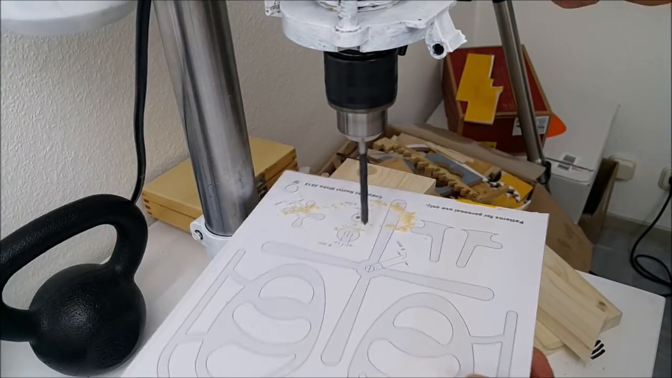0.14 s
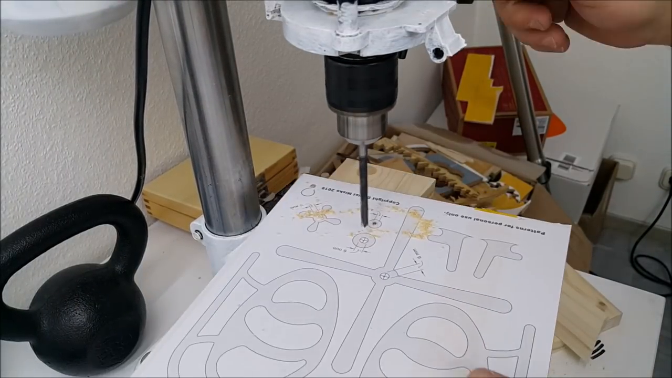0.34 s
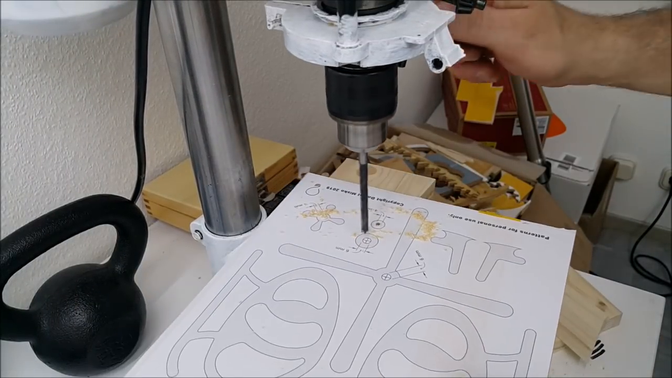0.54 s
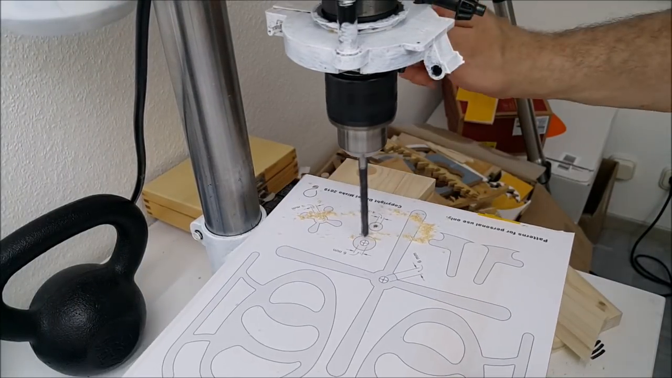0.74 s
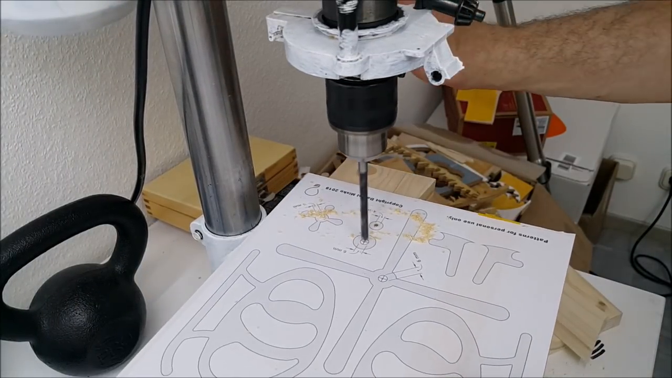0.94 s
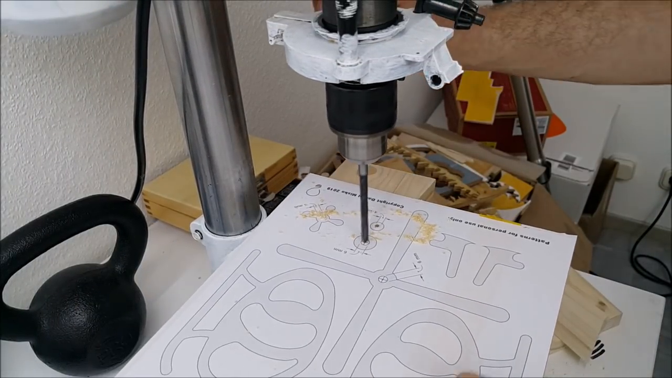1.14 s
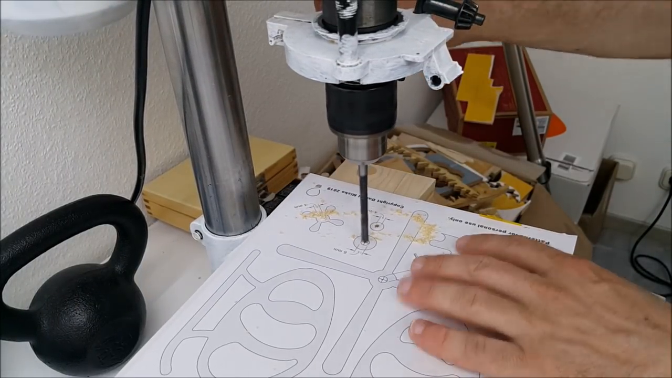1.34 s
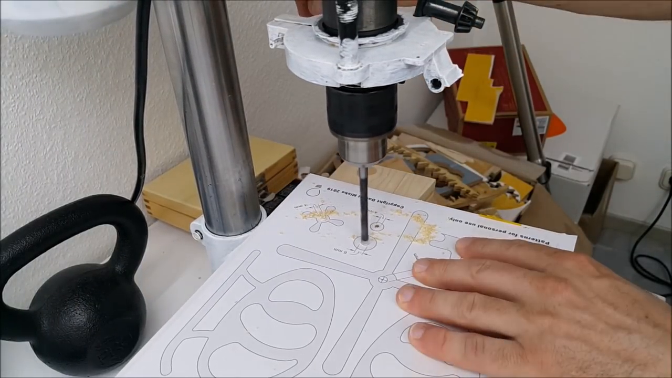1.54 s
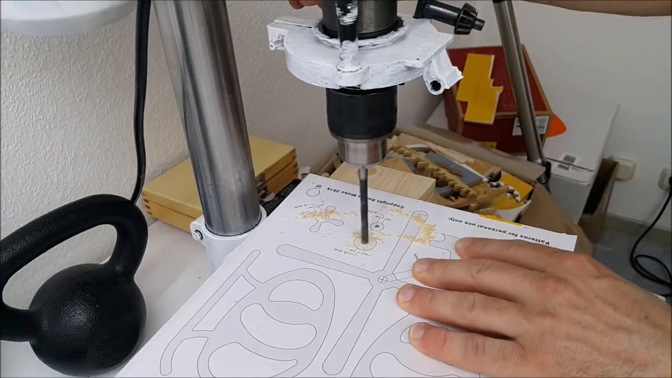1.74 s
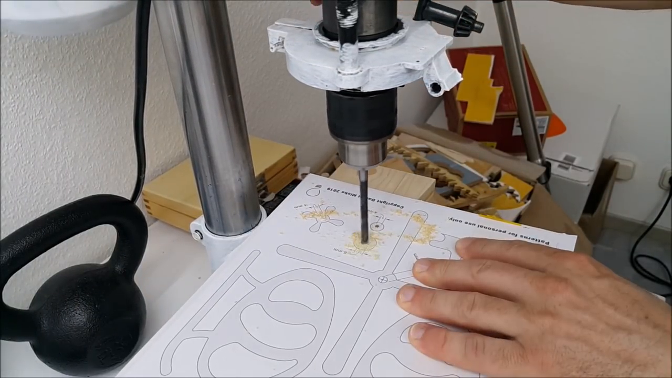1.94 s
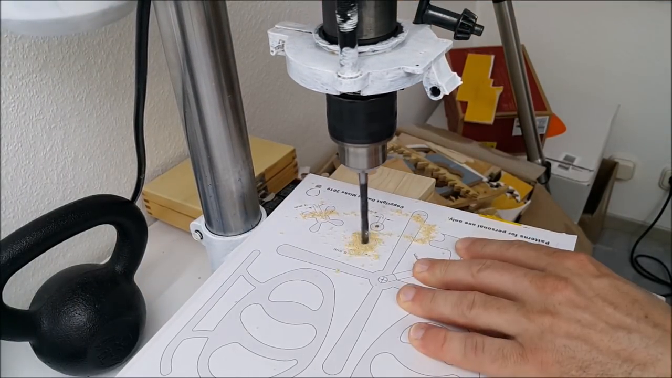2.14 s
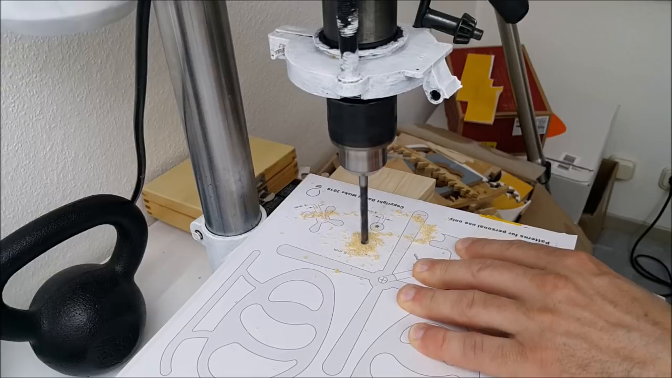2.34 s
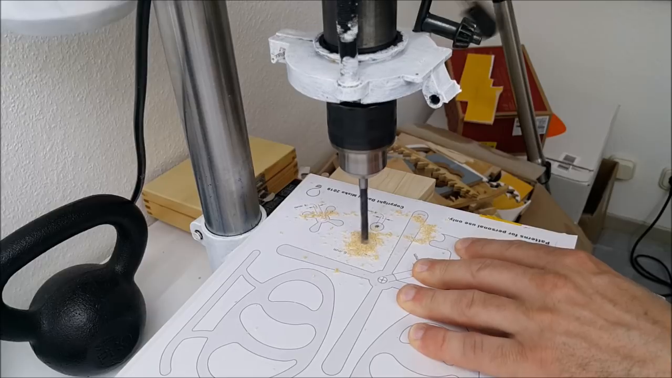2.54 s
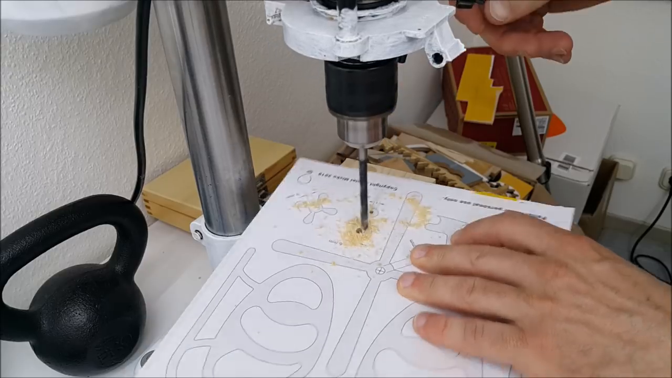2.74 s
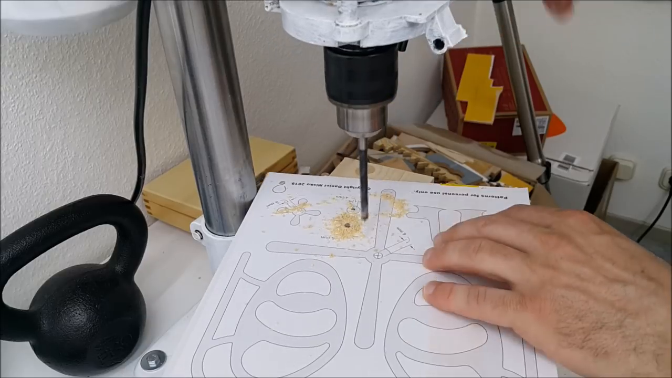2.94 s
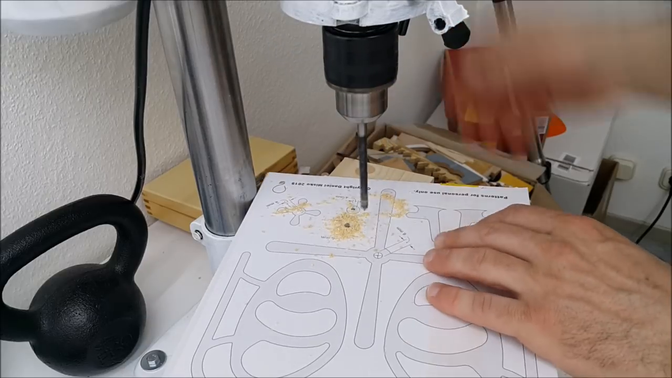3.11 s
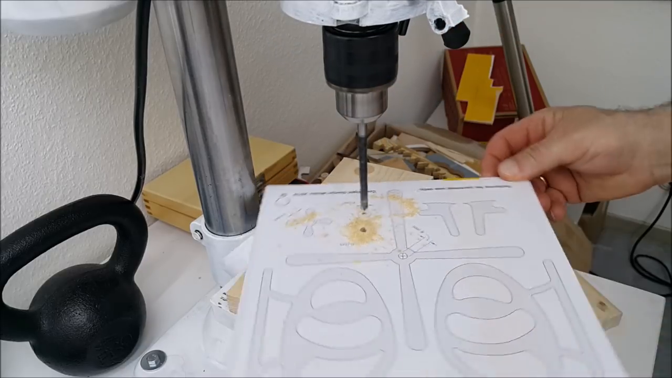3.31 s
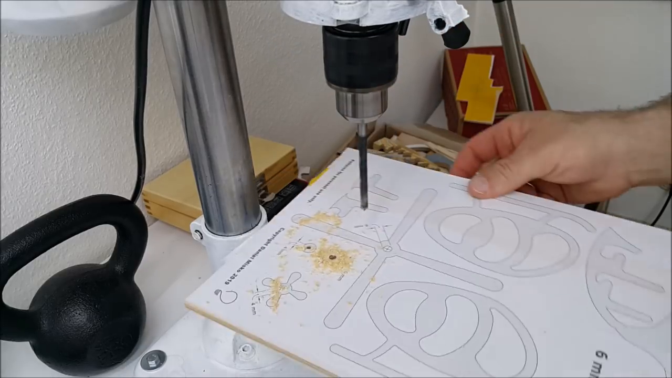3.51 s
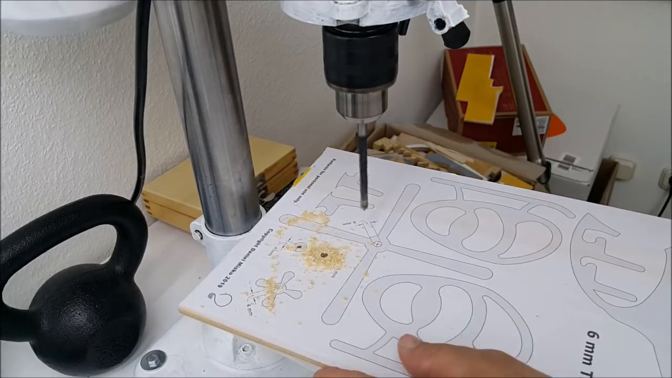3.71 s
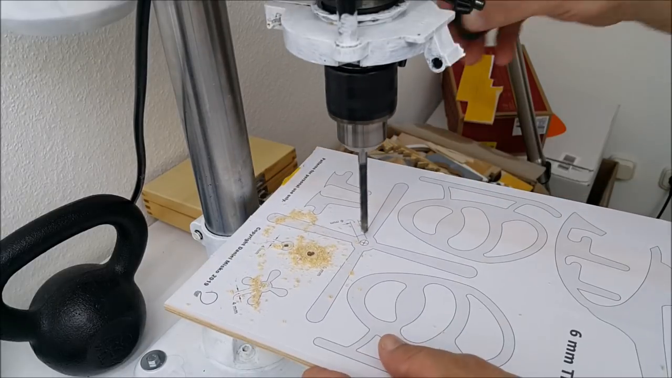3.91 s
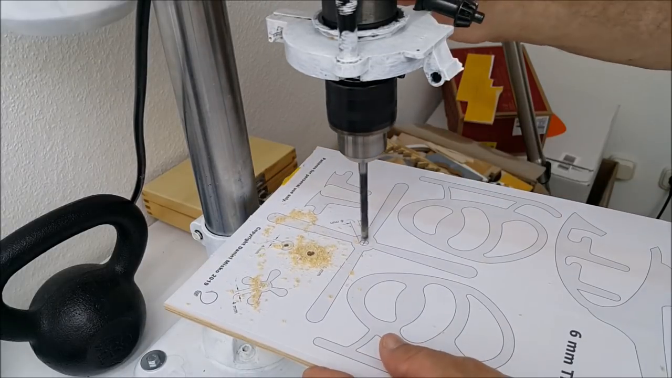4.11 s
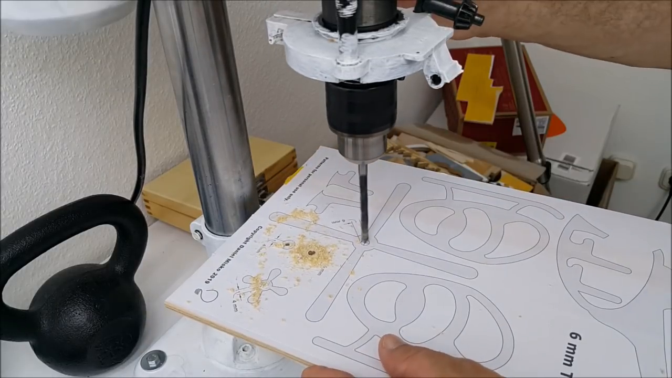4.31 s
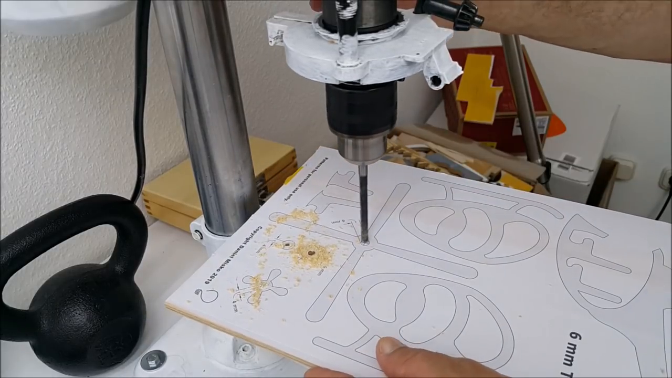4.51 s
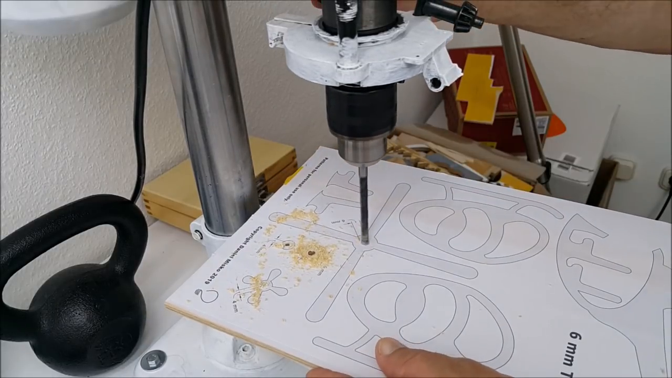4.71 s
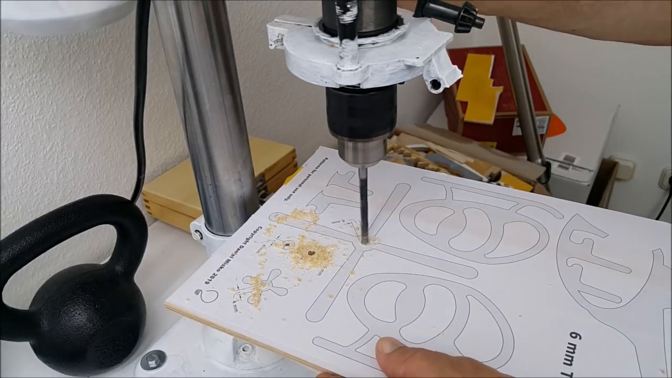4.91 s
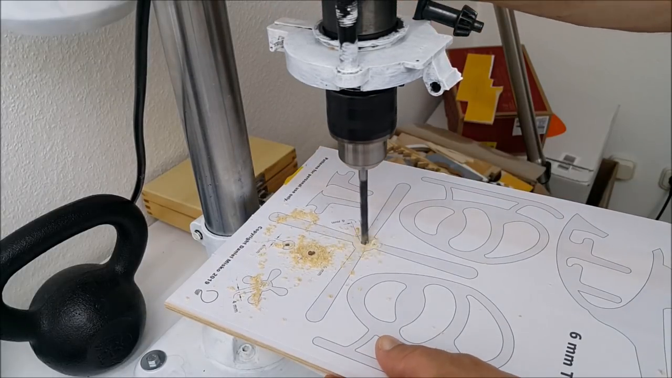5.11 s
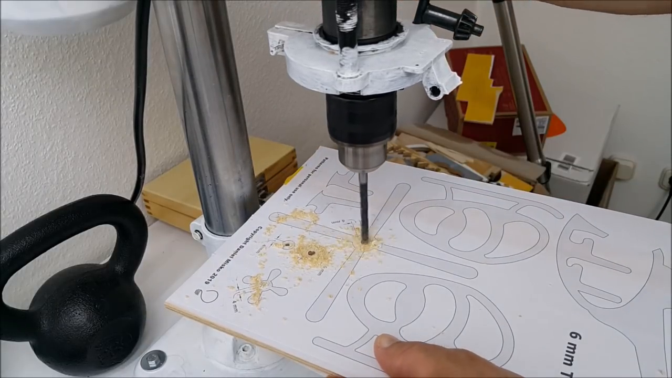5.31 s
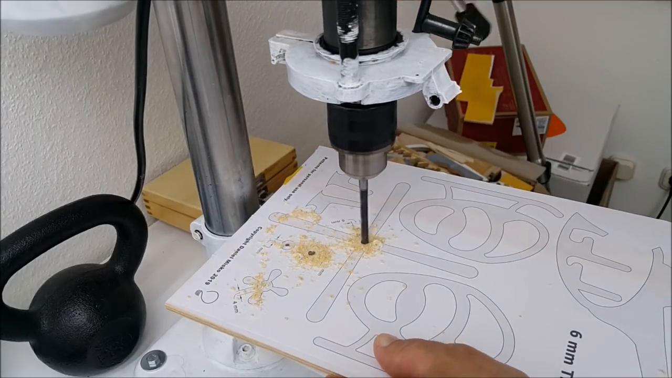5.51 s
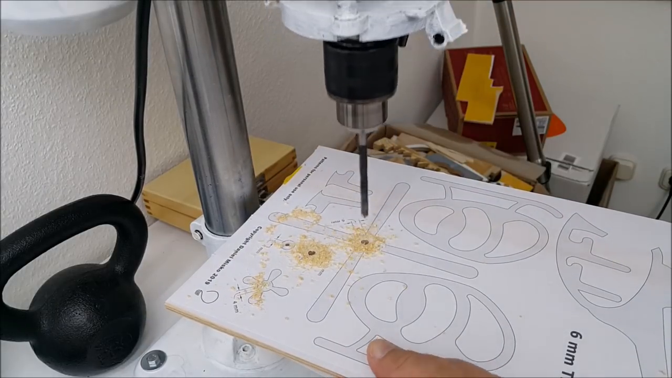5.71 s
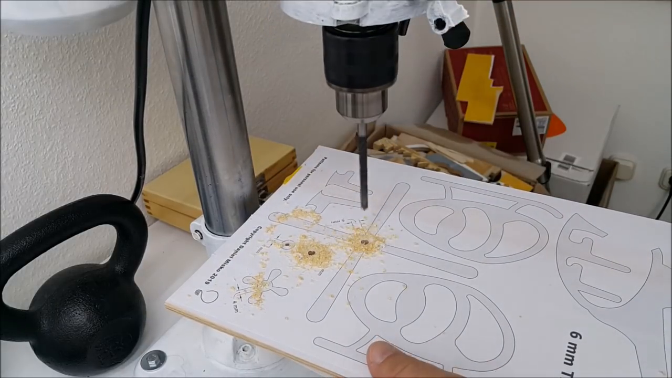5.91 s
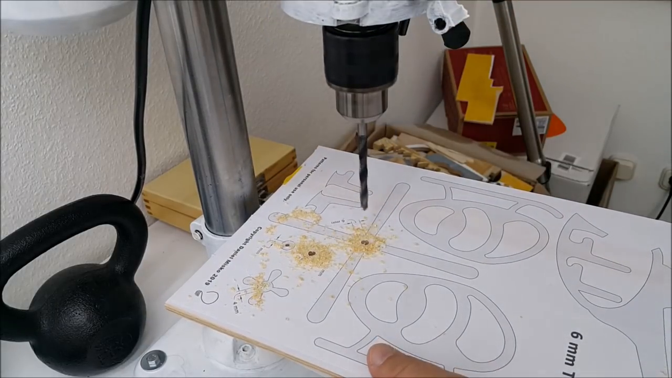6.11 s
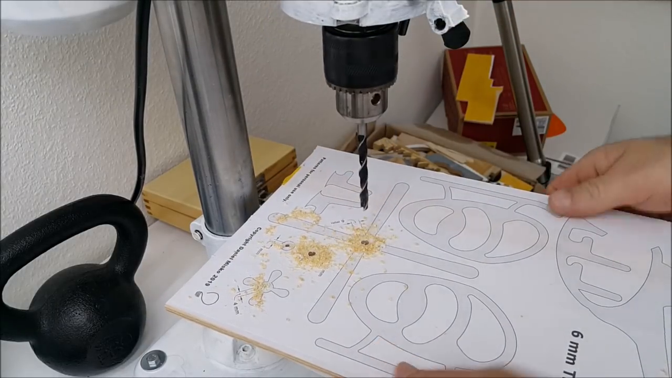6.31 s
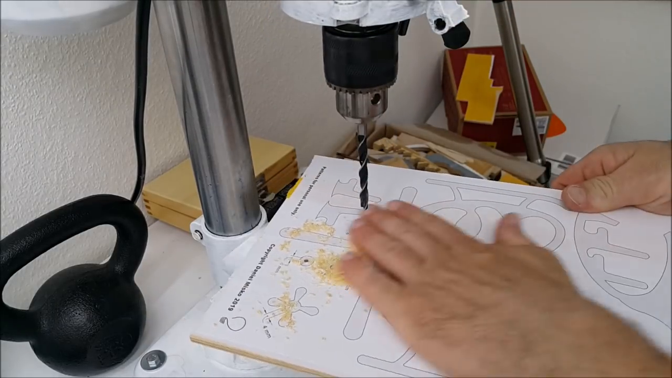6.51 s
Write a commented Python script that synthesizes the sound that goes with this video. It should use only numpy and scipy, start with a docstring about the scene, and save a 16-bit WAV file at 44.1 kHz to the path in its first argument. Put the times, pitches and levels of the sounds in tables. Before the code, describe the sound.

Close up in a small, quiet room, a geared electric drill runs continuously, a rough metallic rattle over a whine and bright airy hiss. The carriage rubs down and the bit bores into a paper-covered board, the rattle growing louder and crunchier. It lifts, the board scrapes across the table, and a second hole follows. The drill quickly dies away with a soft knock; a hand brushes the paper.

```python
"""A geared electric drill in a bench stand runs at a steady speed, and a paper-covered board slides on the
table. The carriage rubs down its column and the bit bores a hole: the gears' noise rattle grows louder under
load. The carriage rises, the board is slid again, and a second hole is bored. Shaft tones and a noise hiss of
brushes and air run throughout. After a last slide the drill's sound fades quickly away, with one light knock, a
noise burst through the housing plus ringing tones; then a hand, made of shaped noise, brushes the paper."""
import sys
import numpy as np
from scipy import signal
from scipy.fft import rfft, irfft, next_fast_len
from scipy.io import wavfile
from scipy.ndimage import map_coordinates

SR = 44100
rng = np.random.default_rng(int(sys.argv[2]) if len(sys.argv) > 2 else 0)


def store_pcm(level_fs):
    """Save levels as 16-bit WAV."""
    pcm = np.round(np.clip(level_fs, -1, 1) * 32767).astype(np.int16)
    wavfile.write(sys.argv[1], SR, np.atleast_2d(pcm).T)


N = 288855
TIME = np.arange(N) / SR  # seconds

# In colour tables only the shape counts: each whole response is levelled to rms 1.
# A relative_db is shifted by a fixed gain where the table is used.

# tones at sums of shaft speeds: motor_order, layshaft_order, spindle_order, relative_db
SHAFT_TONES = [(0, 0, 7, -66.5), (0, 0, 8, -72), (0, 0, 10, -74), (0, 0, 13, -74.5), (1, 0, -2, -71),
               (0, 0, 14, -77), (1, 0, 0, -66), (0, 0, 22, -69.5), (0, 8, 0, -61.5), (2, -1, 0, -63.5),
               (2, 0, 0, -55), (2, 0, 2, -83.5), (2, 1, 0, -60), (2, 2, 0, -61), (3, -1, 0, -70.5),
               (3, 0, 0, -65), (3, 1, 0, -69.5)]
# resonances of gear case and stand: pitch_hz, width_hz, lift_db
HOUSING_MODES = [(192.4, 24, 11), (348, 55, 10.5), (406.6, 28, 9), (550.4, 90, 13), (653.3, 48, 11),
                 (714, 35, 14), (865, 51, 8), (1107, 22, 9), (1289.4, 110, 14), (1442, 126, 14),
                 (1641.6, 89, 15.5), (1770, 96, 14.5), (1854.4, 63, 9), (1990, 69, 2), (2255, 155, 7),
                 (2515, 74, 11.5), (2687, 137, 8.5), (3253, 67, 6), (3540, 28, 11), (4050, 100, 7.5),
                 (4285, 123, 7), (4900, 55, 8), (5250, 61, 6), (5500, 190, 7.5), (6070, 260, 2)]
# dips in the response of gear case and stand: pitch_hz, width_hz, change_db
HOUSING_DIPS = [(226, 22, -3.5), (450, 32, -1), (750, 26, -1.5), (1173, 41, -1), (1350, 39, -3),
                (1687, 23, -1), (2426, 36, -4), (2640, 24, -4.5), (3590, 90, -3), (4900, 110, -4.5),
                (5330, 90, -9.5)]
# broad slope under those resonances: pitch_hz, level_db
HOUSING_SLOPE = [(60, -76), (110, -45), (170, -26), (240, -24.5), (470, -23), (560, -16), (1000, -8),
                 (1500, -13.5), (2000, -0.5), (2900, -5.5), (5000, -8.5), (7000, -13), (9000, -16),
                 (13000, -36)]
# change of gear colour under load in the first hole: pitch_hz, change_db
FIRST_HOLE_COLOUR = [(1150, -6.5), (1290, 3), (1450, -2.5), (1600, 1.5), (1780, -0.5), (2000, 3),
                     (2250, -1), (2550, 0.5), (3400, -2), (4050, 1), (4500, -0.5), (5500, 2), (9000, -0.5)]
# the same in the second hole, with the board turned round: pitch_hz, change_db
SECOND_HOLE_COLOUR = [(780, -9), (885, 7.5), (1020, -2.5), (1150, -8), (1300, 3), (1600, 1), (1770, 1),
                      (1900, 6.5), (2020, 5.5), (2250, 2), (2600, 0.5), (3400, -1.5), (4050, -3), (4500, 0),
                      (5500, -5), (9000, -3)]
# the bit in the wood: touch_s, full_bite_s, ease_s, free_s, load (0-1)
HOLE_TIMES = [(1.193, 1.647, 2.3, 2.83, 0.79), (4.419, 4.88, 5.58, 5.74, 0.66)]
# the rattle swells or slackens: start_s, end_s, change_db
RATTLE_SWELLS = [(.46, .6, 1), (.63, 1.05, 1.0), (2.28, 2.51, 0.8), (2.52, 2.6, -3), (2.612, 2.69, 2),
                 (2.72, 2.98, 1.2), (3.24, 3.52, -0.5), (3.83, 4.17, 1.2), (4.25, 4.31, 1),
                 (4.62, 4.78, -.8), (5.06, 5.2, 0.2), (5.22, 5.37, 1), (5.39, 5.44, -2), (5.77, 5.9, 0.6),
                 (5.9, 6.09, -0.5)]
# the hiss flares into a short rasp or slackens: start_s, end_s, change_db
HISS_RASPS = [(1.19, 1.37, 2), (2.17, 2.32, 1.5), (2.59, 2.67, 0.5), (2.84, 3.2, 1.5), (3.83, 4.2, 0.9),
              (4.39, 4.56, 0.5), (4.58, 4.78, -2), (5.44, 5.5, 2), (5.72, 5.91, 1.5)]
# height of the carriage on its column: time_s, height (0 lowered, 1 raised)
CARRIAGE_HEIGHT = [(0, 0.96), (.45, .9), (.75, 0.3), (1.3, 0), (2.5, 0), (2.85, 1), (3.9, 0.95),
                   (4.12, 0.2), (4.25, 0), (5.6, 0.1), (5.76, 0.85)]
# colour of the air hiss with the drill lowered: pitch_hz, level_db
AIR_LOWERED_COLOUR = [(2500, -32), (4500, 1.5), (5500, 3), (7500, 1.5), (9000, -4.5), (9700, 3.5),
                      (10300, 5.5), (11000, 5), (11800, 2), (12500, 3), (14000, 1.5), (15600, 1)]
# colour of the air hiss with the drill raised: pitch_hz, level_db
AIR_RAISED_COLOUR = [(2500, -30.5), (4700, 4), (5500, 13.5), (5950, 3.5), (6650, 8), (7500, 5.5),
                     (9200, -0.5), (10300, 5), (11100, 0.5), (12800, 3), (14200, 4.5), (15600, 3)]
# colour of the cutting edges' crunch: pitch_hz, level_db
CUT_COLOUR = [(1500, -33.5), (3500, -0.5), (8500, -3.5), (10400, 2.5), (11300, -0.5), (11850, 0.5),
              (12300, 1), (13000, 2.5), (14500, -1.5), (16000, -2.5)]
# the carriage rubs down or up the column: start_s, end_s, level_db
CARRIAGE_FEEDS = [(1.21, 1.4, -42), (2.61, 2.73, -48), (4.38, 4.62, -44), (5.8, 5.91, -48)]
# colour of that rubbing: pitch_hz, level_db
COLUMN_COLOUR = [(150, -57), (1200, -24), (2800, -5.5), (3900, -3), (4700, -6), (6000, -26.5), (15000, -32)]
# hard clashes of the gears: time_s, relative_db
GEAR_CLASHES = [(.651, -30), (0.68, -29.5), (.738, -24), (.773, -30), (.8185, -28), (0.9548, -27),
                (1.051, -32), (1.1358, -24.5), (1.1836, -26.5), (1.376, -31.5), (1.391, -32), (1.5468, -30),
                (1.6175, -23), (1.8252, -27), (1.9215, -29), (2.097, -27), (2.4545, -27), (2.473, -28),
                (3.272, -28.5), (3.4, -31.5), (4.2774, -26.5), (4.567, -31), (4.8918, -25), (5.01, -25.5),
                (5.036, -26), (5.289, -27.5), (5.348, -27), (5.854, -25.5), (6.098, -33)]
# sharp ticks: time_s, relative_db
TICK_TIMES = [(.6519, -28), (.829, -25), (1.074, -26), (1.1817, -26), (1.3009, -24.5), (1.5477, -29),
              (1.7434, -26.5), (1.9116, -26), (2.0462, -24.5), (2.1909, -25), (2.2528, -24),
              (2.2987, -22.5), (2.4438, -25.5), (2.589, -28), (2.6035, -22), (2.7487, -28.5),
              (2.7965, -25.5), (2.8439, -27.5), (4.1669, -31), (4.4962, -28.5), (5.4695, -22)]
# colour of the ticks: pitch_hz, level_db
TICK_COLOUR = [(1000, -24), (2500, 10), (6000, 14), (9000, 1), (15000, -1)]
# thin, bright crackles: time_s, level_db
CRACKLE_TIMES = [(.8195, -39), (1.2171, -34), (1.3014, -40), (1.5693, -36.5), (2.1914, -35), (2.5611, -42),
                 (2.68, -41), (2.88, -39), (2.9043, -39), (3.042, -34), (4.1669, -37.5), (4.3934, -39.5),
                 (4.46, -37)]
# colour of the crackles: pitch_hz, level_db
CRACKLE_COLOUR = [(2000, -29), (5000, -2), (10500, 1), (15500, -1.5)]
# dull bumps: time_s, relative_db
BUMP_TIMES = [(1.245, -47), (1.305, -47), (2.525, -48), (2.57, -49.5), (2.89, -54), (4.45, -51),
              (5.44, -50)]
# colour of the bumps: pitch_hz, level_db
BUMP_COLOUR = [(60, -41), (150, -16), (300, -1.5), (420, 7.5), (600, -15), (1200, -56.5)]
# faint low thumps in the bench: time_s, relative_db
THUMP_TIMES = [(.45, -80), (.633, -74), (1.3, -67.5), (2.096, -69), (2.168, -71), (2.235, -73),
               (2.809, -73), (3.399, -73), (5.794, -66), (6.03, -73)]
# colour of the bench: pitch_hz, level_db
BENCH_COLOUR = [(20, -9), (45, -3.5), (75, -0.5), (110, -5), (170, -19), (400, -60)]
# the board judders against bit or table: start_s, end_s, level_db
BOARD_JUDDERS = [(2.612, 2.71, -37), (3.02, 3.11, -41), (3.84, 3.98, -41), (5.44, 5.53, -39.5),
                 (5.8, 5.9, -42)]
# colour of the juddering wood: pitch_hz, level_db
WOOD_COLOUR = [(200, -33), (500, -10), (1000, -1.5), (1350, 0), (1800, -3), (2300, 1), (3000, -3),
               (4200, -5), (6000, -14), (12000, -30)]
# the board slides on the table: start_s, end_s, level_db
BOARD_SLIDES = [(0, .62, -46.5), (3.005, 3.125, -42), (3.828, 4.14, -49), (5.714, 5.92, -44.5),
                (6.02, 6.16, -45), (6.17, 6.22, -52)]
# colour of the sliding: pitch_hz, level_db
SLIDE_COLOUR = [(200, -56), (1500, -24), (3200, -16), (5600, 13.5), (7200, -2), (9000, -4), (15000, -31)]
# the sliding board catches on grit: time_s, level_db
GRIT_CATCHES = [(3.0106, -34), (3.04, -32), (3.0614, -30), (3.073, -34), (3.8422, -35), (3.8546, -31),
                (3.882, -31), (3.938, -30), (5.7189, -37), (5.7668, -27.5), (5.793, -39), (5.85, -33.5),
                (5.948, -32.5), (6.0447, -36), (6.072, -36), (6.106, -31.5), (6.19, -41)]
# colour of those catches: pitch_hz, level_db
GRIT_COLOUR = [(800, -29.5), (2500, -9), (4200, -3), (6000, 2), (7500, -3), (10000, -16.5), (15000, -24)]
# tones of the stand that hang on after the knock: pitch_hz, level_db, t60_s (time to fall 60 dB)
STAND_TONES = [(180, -87, .5), (705, -67, .07)]
# the hand on the paper: time_s, rub_db, hiss_db
HAND_SWEEP = [(6.385, -92, -100), (6.415, -76, -88), (6.445, -68, -72), (6.472, -64, -70),
              (6.492, -76, -73), (6.55, -79, -65.5)]
# colour of the palm's rub: pitch_hz, level_db
PALM_COLOUR = [(60, -45.5), (150, -22), (400, -2), (700, -8), (1200, -2), (1750, 0), (2500, -10), (3450, 1),
               (4200, -9), (5000, -22), (7800, -38.5)]
# colour of the paper's hiss: pitch_hz, level_db
PAPER_COLOUR = [(1760, -34), (3000, -9), (3720, -15), (3960, -9), (12200, 1.5), (15800, -8)]
# colour of the quiet room: pitch_hz, level_db
ROOM_COLOUR = [(15, 7), (25, -7), (45, -17), (100, -26), (180, -14), (330, -19), (830, -9), (1040, -18),
               (1230, -12), (1400, -29), (15800, -26)]
# how alike left and right are: pitch_hz, likeness (-1 to 1)
STEREO_LIKENESS = [(100, 0.84), (1750, 0.99), (2150, 0.69), (2500, 0.83), (2900, 0.31), (4050, 0.69),
                   (4900, 0.36), (5700, -0.18), (6200, 0.6), (7000, -0.13), (12000, 0.14), (13200, -0.2),
                   (15000, -0.039)]
# how much stronger left is than right: pitch_hz, difference_db
STEREO_TILT = [(200, 0.5), (650, 3), (1100, 1.5), (2000, -1), (2600, -0.5), (3300, 4.5), (4600, 0.5),
               (9000, 0.5), (14000, -1.5)]

MOTOR_HZ, LAYSHAFT_HZ, SPINDLE_HZ = 400.1, 83.13, 26.45  # turns per second, before a slight drift
FADE_START_S, STOP_S = 6.112, 6.318  # the drill's sound starts to fade, and is gone
KNOCK_S = 6.283  # the light knock as the drill's sound fades
# trim of tones and drone, and steepness of their fade
MOTOR_DB, MOTOR_FADE_POWER = -1, 1.9
# base level before the gains of each layer, rise at full load, steepness of the fade
RATTLE_DB, RATTLE_LOAD_DB, RATTLE_FADE_POWER = -36.5, 4.5, 2.74
HISS_DB, HISS_LOAD_DB, HISS_FADE_POWER = -46, 3.5, 3
SWELL_EDGE_S = 0.0083  # time in which a swell sets in or ends
SLIDE_RISE_S, SLIDE_FALL_S = 0.022, 0.045  # a push gathers speed and comes to rest
TONE_WAVER_DB, TONE_WAVER_RATE = .8, 6  # depth, and random points per second
WAVER_SHARE, WAVER_RATE = .006, 9  # rough share of pitch, and random points per second
RING_HZ, RING_DB, RING_T60_S = 1244, -64, .7  # tone of the stand that outlasts the drill
TOP_HZ = 15870  # nothing is kept from here up


def gears(angles):
    """Free teeth clash across their gaps; pressed together by the cut they ring the housing more evenly."""
    load = bit_load()
    unsteady = (1 - .5 * load) * flutter(depth_db=0.92, rate=90)
    level_db = RATTLE_DB + RATTLE_LOAD_DB * load + swells(RATTLE_SWELLS) + unsteady
    level = amp(level_db) * fade_gain(RATTLE_FADE_POWER)
    force = beating(angles, motor=0.11, layshaft=0.12, spindle=0.03)

    def case(hz):
        """The housing without its low end."""
        return housing(hz) + above(hz, corner_hz=1215, order=10)

    impacts = grains(rate=6500, spread_db=3.0, life=0.0006)
    clashes = amp(1.0) * np.sqrt(1 - load) * level * force * impacts
    free = heard(clashes * noise(), case)

    pressed = beating(angles, motor=0.13, layshaft=.08, spindle=.02)
    grind = amp(2.0) * np.sqrt(load) * level * pressed * noise()
    middle_s = N / SR / 2  # lies between the two holes
    first = heard(grind * (TIME < middle_s), lambda hz: case(hz) + along(FIRST_HOLE_COLOUR, hz))
    second = heard(grind * (TIME > middle_s), lambda hz: case(hz) + along(SECOND_HOLE_COLOUR, hz))

    # the low modes of the stand drone at one level, whatever the load
    drone_level = amp(-44) * motor_level() * fade_gain(0.76)
    drone = heard(force * drone_level * noise(), lambda hz: housing(hz) + below(hz, 1144, order=10))
    return free + waver(first + second) + drone


def gear_clashes():
    """Hard clashes of the gears: a noise burst in the housing plus its strongest mode ringing."""
    blows = amp(-6) * bursts(GEAR_CLASHES, t60=0.048)
    burst = heard(blows * noise(), lambda hz: housing(hz) + above(hz, corner_hz=1300, order=8))
    return amp(-1) * clash_ring(hz=1795, attack=0.001, t60=0.084) + burst


def clash_ring(hz, attack, t60):
    """Each clash sets the strongest mode of the gear case ringing, a little off pitch each time."""
    out, age = np.zeros(N + SR), np.arange(SR // 5) / SR
    chances = rng.standard_normal((len(GEAR_CLASHES), 2))
    for (s, db), (detune, phase) in zip(GEAR_CLASHES, chances):
        swell = amp(db - 60 * age / t60) * (1 - np.exp(-age / attack))
        turns = hz * (1 + 0.0096 * detune) * age + phase
        out[round(s * SR):][:len(age)] += swell * np.sin(2 * np.pi * turns)
    return out[:N]


def whine(angles):
    """Imbalance and gear errors sound at multiples of the shaft speeds and their sums and differences."""
    tones = 0
    for *orders, db in SHAFT_TONES:
        level = amp(db + TONE_WAVER_DB * wobble(TONE_WAVER_RATE))
        phase = rng.uniform(0, 2 * np.pi) + 0.09 * wobble(13)
        tones = tones + level * np.sin(np.round(orders) @ angles + phase)
    left_right = amp([[1], [-1]])  # left 2 dB stronger
    return np.sqrt(2) * tones * motor_level() * left_right


def hiss(angles):
    """Brushes and air fizz and spit, coloured by the drill's height; under load the cutting crunch takes over."""
    load = bit_load()
    height = np.clip(curves(CARRIAGE_HEIGHT)[0], 0, 1)
    level_db = HISS_DB + HISS_LOAD_DB * load + swells(HISS_RASPS) + flutter(depth_db=1.56, rate=60)
    level = amp(level_db) * fade_gain(HISS_FADE_POWER)
    force = level * beating(angles, motor=.025, layshaft=0.15, spindle=0.025)

    spits = grains(rate=170, spread_db=4.0, life=0.0028)
    fine_air = grains(rate=2800, spread_db=0.5, life=0.00099)
    fine_cut = grains(rate=14000, spread_db=1.5, life=.0012)
    air = np.sqrt(1 - load) * force * np.hypot(amp(2.2) * fine_air, amp(-3.5) * spits)
    cut = np.sqrt(load) * force * np.hypot(amp(3.5) * fine_cut, amp(-11) * spits)

    lowered = fizz(AIR_LOWERED_COLOUR, amp(-0.05) * np.sqrt(1 - height) * air)
    raised = fizz(AIR_RAISED_COLOUR, amp(1.6) * np.sqrt(height) * air)
    return lowered + raised + fizz(CUT_COLOUR, cut)


def ring_on():
    """The stand rings faintly while the drill shakes it and dies away after the drill begins to fade."""
    unsteady = flutter(depth_db=2.5, rate=8) * (TIME < FADE_START_S)
    decay_db = 60 * np.maximum(TIME - FADE_START_S, 0) / RING_T60_S
    level = amp(RING_DB + unsteady - decay_db)
    return level * np.sin(2 * np.pi * RING_HZ * TIME + 2 * wobble(20) * fade_gain(1))


def carriage():
    """The drill's carriage rubs along the column as it is lowered and raised: grainy noise."""
    return rush(COLUMN_COLOUR, strokes(CARRIAGE_FEEDS) * grains(rate=1200, spread_db=3.5, life=0.00092))


def ticks_and_crackles():
    """Sharp ticks and thin, bright crackles: short bursts of noise."""
    ticks = rush(TICK_COLOUR, amp(-6.0) * bursts(TICK_TIMES, t60=0.032))
    return ticks + rush(CRACKLE_COLOUR, bursts(CRACKLE_TIMES, t60=.04))


def bumps_and_thumps():
    """Dull bumps, and faint low thumps in the bench: dying bursts of low noise."""
    bumps = rush(BUMP_COLOUR, amp(-1.0) * bursts(BUMP_TIMES, t60=0.14))
    return bumps + rush(BENCH_COLOUR, amp(-4) * bursts(THUMP_TIMES, t60=0.13))


def judder():
    """The board sticks and slips in quick, woody chatter."""
    return rush(WOOD_COLOUR, strokes(BOARD_JUDDERS) * grains(rate=600, spread_db=1, life=.0018))


def board_slide():
    """The board scrapes over grit on the table in tiny random impacts, and catches on it."""
    grit = strokes(BOARD_SLIDES) * grains(rate=420, spread_db=4, life=0.00044)
    table = ripple(depth_db=0.5, spacing_hz=105.0)
    scrape = heard(grit * noise(), lambda hz: along(SLIDE_COLOUR, hz) + along(table, hz))
    return scrape + rush(GRIT_COLOUR, bursts(GRIT_CATCHES, t60=0.023))


def last_knock():
    """One light, soft blow on the stand: the housing rings briefly, the stand's tones hang on."""
    age = np.maximum(TIME - KNOCK_S, 0)
    ring = sum(amp(db - 60 * age / t60) * np.sin(2 * np.pi * hz * age) for hz, db, t60 in STAND_TONES)
    soft_start = np.clip(age / 0.005, 0, 1)
    blow = bursts([(KNOCK_S, -50)], t60=0.062) * soft_start
    return ring + heard(blow * noise(), lambda hz: housing(hz) + below(hz, 4700, order=2))


def hand_on_paper():
    """A palm sweeps the paper: a grainy rub from the skin and a smooth hiss from the sheet."""
    rub, swish = amp(curves(HAND_SWEEP))
    palm = rush(PALM_COLOUR, rub * grains(rate=1000, spread_db=1, life=.001))
    return palm + rush(PAPER_COLOUR, swish)


def room():
    """Quiet steady noise of the room."""
    return rush(ROOM_COLOUR, amp(-75))


def shaft_angles():
    """Motor, layshaft and spindle turn locked together, with a slight common speed drift."""
    clock = TIME + np.cumsum(0.0005 * wobble(4.65)) / SR
    return 2 * np.pi * np.outer([MOTOR_HZ, LAYSHAFT_HZ, SPINDLE_HZ], clock)


def beating(angles, motor, layshaft, spindle):
    """Contact force swells once a turn of each shaft; on the layshaft it jumps up and eases off."""
    kick = np.sin(angles[1]) + np.sin(2 * angles[1]) / 2 + np.sin(3 * angles[1]) / 3
    return unit(np.exp(motor * np.cos(angles[0]) + layshaft * kick + spindle * np.cos(angles[2])))


def bit_load():
    """Load on the bit, 0-1: in each hole it builds up, holds and eases off."""
    total = sum(load * np.interp(TIME, [touch, bite, ease, free], [0, 1, 1, 0])
                for touch, bite, ease, free, load in HOLE_TIMES)
    return np.clip(total, 0, 1)


def fade_gain(power):
    """Gain of the drill: 1 while it runs, then a power of the share of the fade that is left."""
    return np.clip((STOP_S - TIME) / (STOP_S - FADE_START_S), 0, 1) ** power


def motor_level():
    """Gain of everything that follows the motor alone."""
    return amp(MOTOR_DB) * fade_gain(MOTOR_FADE_POWER)


def housing(hz):
    """Response of gear case and stand in dB: a slope with resonances and dips."""
    modes = sum(db / (1 + (2 * (hz - centre) / width) ** 2)
                for centre, width, db in HOUSING_MODES + HOUSING_DIPS)
    return along(HOUSING_SLOPE, hz) + modes


def waver(x):
    """Uneven cutting pressure bends the ringing a little up and down in pitch."""
    at = (TIME + WAVER_SHARE / WAVER_RATE * wobble(WAVER_RATE)) * SR
    return np.array([map_coordinates(channel, [at], order=5) for channel in x])


def fizz(spectrum, envelope):
    """Hiss that reaches the microphones past metal parts, each path with its own fine ripple."""
    metal = ripple(depth_db=1.9, spacing_hz=90)
    return heard(envelope * noise(), lambda hz: along(spectrum, hz) + along(metal, hz))


def ripple(depth_db, spacing_hz):
    """Many close, weak resonances as random points: pitch_hz, change_db."""
    hz = np.arange(400) * max(spacing_hz, 50)
    return np.column_stack([hz, depth_db * rng.standard_normal(len(hz))])


def swells(rows):
    """Level change in dB from rows start_s, end_s, change_db with soft edges."""
    return sum(db * np.clip(np.minimum(TIME - start, end - TIME) / SWELL_EDGE_S, 0, 1)
               for start, end, db in rows)


def strokes(rows):
    """Envelope of pushes (start_s, end_s, level_db) that gather speed and come to rest."""
    total = 0
    for start, end, db in rows:
        rise = np.interp(TIME, [start, start + SLIDE_RISE_S], [0, 1])
        fall = np.interp(TIME, [end - SLIDE_FALL_S, end], [1, 0])
        total = total + amp(db) * rise * fall
    return total


def bursts(rows, t60):
    """Envelope of sudden blows (time_s, level_db) that fall 60 dB in t60 seconds."""
    return sum(amp(db - 60 * np.maximum(TIME - s, 0) / t60) * (TIME >= s) for s, db in rows)


def grains(rate, spread_db, life):
    """Envelope of rms 1 of random tiny impacts: rate per second, uneven size, life in seconds."""
    power = (rng.random(N) < rate / SR) * amp(spread_db * rng.standard_normal(N)) ** 2
    return unit(np.sqrt(signal.lfilter([1], [1, -np.exp(-1 / (life * SR))], power)))


def flutter(depth_db, rate):
    """Quick random unsteadiness of a level, in dB."""
    return depth_db * wobble(rate)


def wobble(rate):
    """A smooth random curve through `rate` random points a second."""
    return map_coordinates(rng.standard_normal(int(N * rate / SR) + 4), [TIME * rate])


def noise():
    """Two independent channels of white noise."""
    return rng.standard_normal((2, N))


def rush(spectrum, envelope):
    """Noise under an envelope, coloured by a spectrum."""
    return heard(envelope * noise(), lambda hz: along(spectrum, hz))


def heard(pair, level):
    """Two force signals ring through a response (dB at each Hz) and reach the two microphones."""
    size = 2 * next_fast_len(N // 2 + SR // 4)
    hz = np.fft.rfftfreq(size, 1 / SR)
    gain = unit(amp(level(hz)))
    # fold the cepstrum so that the ringing only follows a blow and never comes before it
    cepstrum = irfft(np.log(gain + 1e-6))
    cepstrum[1:size // 2] *= 2
    cepstrum[size // 2 + 1:] = 0
    response = np.exp(rfft(cepstrum))
    # share the sound between middle and sides to make left and right as alike as listed
    turn = np.arccos(np.clip(along(STEREO_LIKENESS, hz), -1, 1)) / 2
    mid, side = rfft(pair, size) * response * [np.cos(turn), np.sin(turn)]
    lean = amp(along(STEREO_TILT, hz) / 2)
    return irfft(np.array([(mid + side) * lean, (mid - side) / lean]))[:, :N]


def above(hz, corner_hz, order):
    """Slope in dB that lets only frequencies above the corner through."""
    return -10 * np.log10(1 + (corner_hz / (hz + 1)) ** order)


def below(hz, corner_hz, order):
    """Slope in dB that lets only frequencies below the corner through."""
    return above(corner_hz, hz, order)


def along(points, hz):
    """Read a curve of pitch_hz, value points on a log pitch axis."""
    f, v = np.transpose(points)
    return np.interp(np.log(hz + 1), np.log(f + 1), v)


def curves(rows):
    """One value per sample for each column after the time."""
    s, *cols = np.transpose(rows)
    return [np.interp(TIME, s, c) for c in cols]


def amp(db):
    """Turn decibels into a plain gain."""
    return 10 ** (np.asarray(db) / 20)


def unit(x):
    """Scale to rms 1."""
    return x / np.sqrt(np.mean(x ** 2) + 1e-20)


def scene():
    """Drill, stand, board, hand and the quiet room."""
    angles = shaft_angles()
    drill = gears(angles) + gear_clashes() + whine(angles) + hiss(angles) + ring_on() + carriage()
    blows = ticks_and_crackles() + bumps_and_thumps() + last_knock()
    board = judder() + board_slide() + hand_on_paper()
    return drill + blows + board + room()


def record(dry):
    """Keep nothing above the band limit."""
    size = next_fast_len(N + SR // 4)
    kept = np.fft.rfftfreq(size, 1 / SR) < TOP_HZ
    return irfft(rfft(dry, size) * kept, size)[:, :N]


dry = scene()
out = record(dry)
store_pcm(out)
```